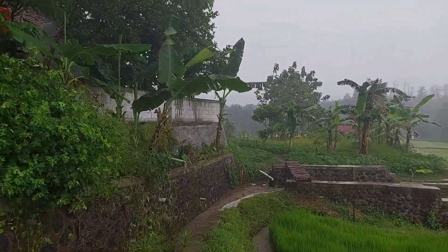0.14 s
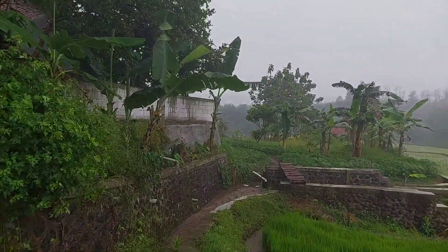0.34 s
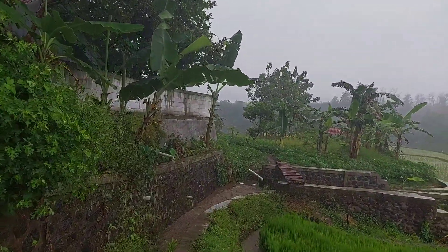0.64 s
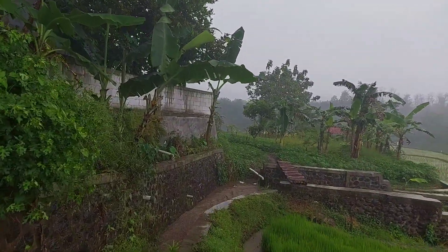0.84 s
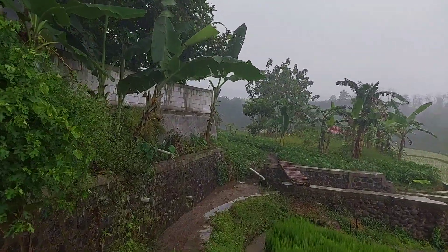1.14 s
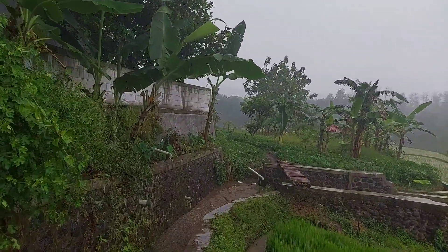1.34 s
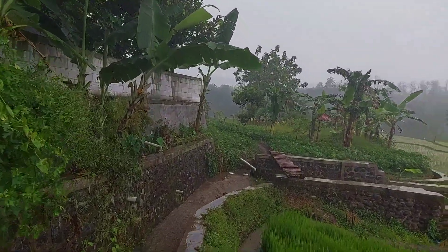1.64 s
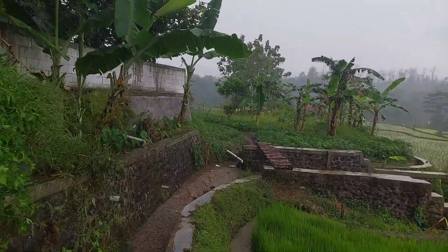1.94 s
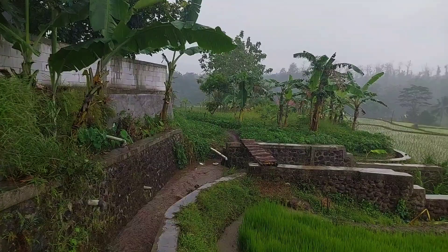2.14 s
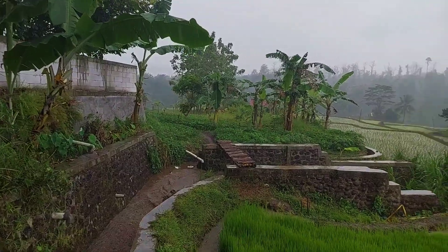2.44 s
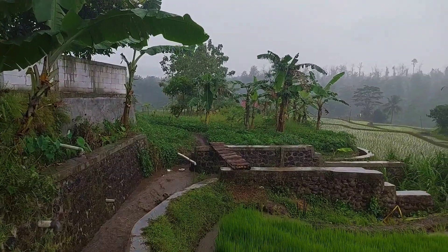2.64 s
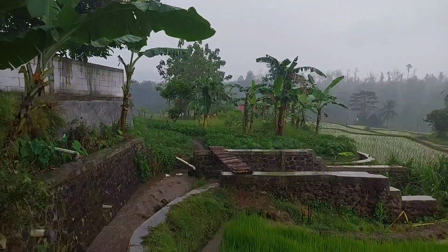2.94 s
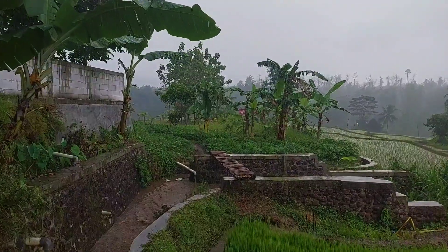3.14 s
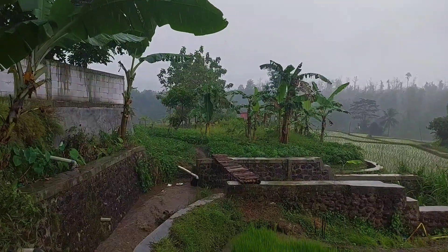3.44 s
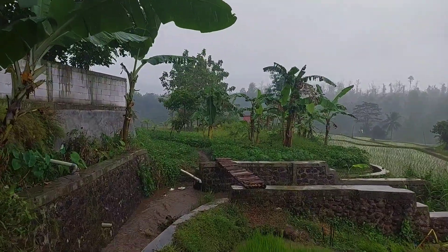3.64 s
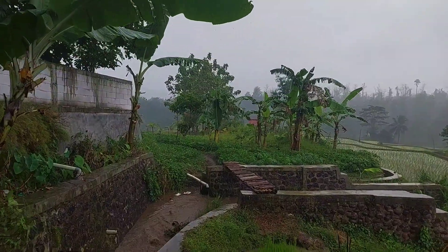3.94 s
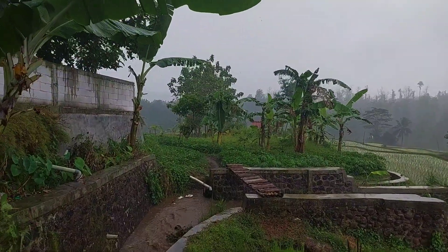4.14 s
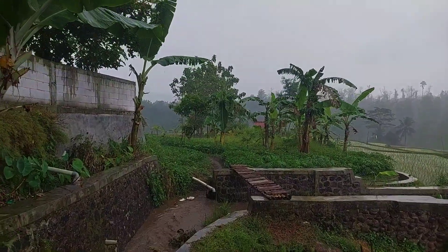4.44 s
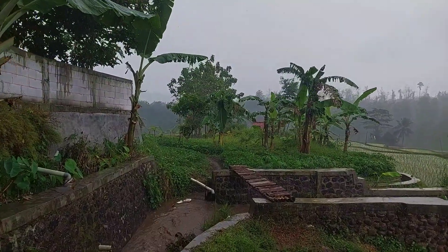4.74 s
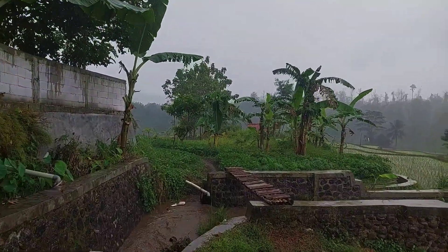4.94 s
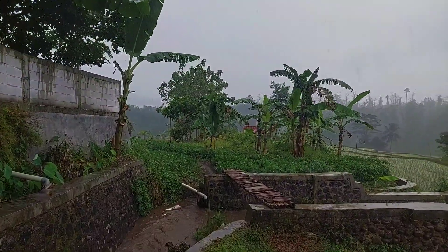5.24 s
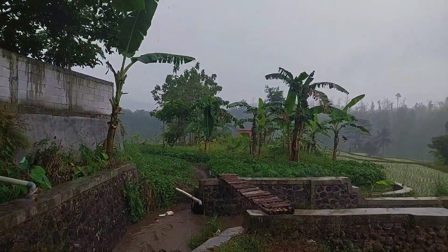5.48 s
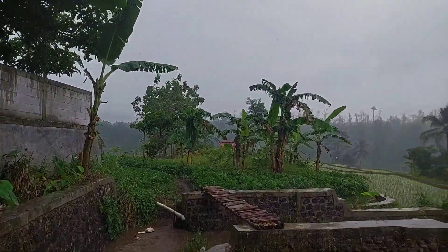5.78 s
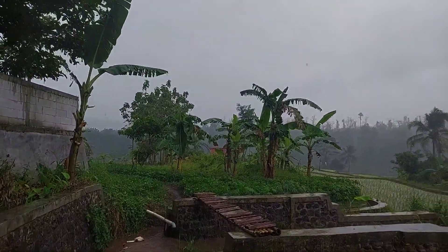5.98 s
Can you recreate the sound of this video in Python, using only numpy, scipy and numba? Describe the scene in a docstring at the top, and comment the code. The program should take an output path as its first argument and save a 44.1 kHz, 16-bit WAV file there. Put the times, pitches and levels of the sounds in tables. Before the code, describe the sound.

Heavy rain in the open, on leaves, stone and mud, runs throughout as a muffled, fluttering hiss with dense fine patter. Water films over both microphones give it a hollow bottle-like tone, lower on the left, higher on the right, with dull treble. From 0 to 1.2 s many close drops plunk and tick on the housing, on both sides, while low wind buffets mainly the right, notably near 0.8 s. At 1.73 s a heavy drop smacks the left microphone, a distorted plop with a short low wobble; the rain ducks. A louder left hit at 2.51 s drops the level further; it holds low for about a second, then climbs back. Sparse ticks and wind gusts follow, around 3, 4.1 and 4.3 s. Small knocks come near 4.6 and 5.0 s. At 5.32 s a heavy drop bursts on the right with a deep wobble and another duck. Rain strengthens from 5.7 s to the end at 6.1 s, though still held down.

```python
"""Heavy rain on leaves, stone and mud, heard by a small camera carried through it: hiss and patter made from noise
and random impacts. Water films close both microphone ports, so each rings like a tiny bottle and muffles the treble.
From the start drops ring the ports and knock the housing, while wind, made from narrow low noise, buffets the right.
Near 1.7 and 2.5 s heavy drops hit the left port, near 5.3 s the right: they overload the input, duck the gain
control and leave a film wobbling as a decaying low tone. The rain is strongest from about 5.7 s."""
import sys
import numpy as np
from scipy import signal
from scipy.fft import rfft, irfft
from scipy.io import wavfile
from scipy.ndimage import uniform_filter1d, minimum_filter1d
from numba import njit

SR = 44100
rng = np.random.default_rng(int(sys.argv[2]) if len(sys.argv) > 2 else 0)


def log_audio(samples):
    """Write samples as a 16-bit WAV file to the path given in sys.argv[1]."""
    # one column per channel
    frames = np.atleast_2d(samples).T
    # limit to full scale, then quantise
    limited = np.clip(frames, -1, 1)
    pcm = np.round(limited * 32767).astype(np.int16)
    wavfile.write(sys.argv[1], SR, pcm)


def volts(x):
    """Linear amplitude factor 10**(x/20) for a level x in dB, scalar or array-like."""
    e = np.asarray(x, float) / 20
    return 10 ** e


N = 269451
T = np.arange(N) / SR


def curve(table):
    """Columns of a table joined by straight lines in time."""
    s, *columns = np.transpose(table)
    return [np.interp(T, s, c) for c in columns]


def unit(x):
    """Scale to rms 1."""
    return x / np.sqrt(np.mean(x ** 2))


def butter(x, hz, kind, order=2):
    """Butterworth filter."""
    return signal.sosfilt(signal.butter(order, hz, kind, fs=SR, output="sos"), x)


def colour(x, table):
    """Causal (minimum-phase) filter through (frequency [Hz], level [dB]) points, from the folded cepstrum."""
    hz, db = np.transpose(table)
    grid_hz = np.maximum(np.arange(2049) * SR / 4096, 1)
    level_db = np.interp(np.log(grid_hz), np.log(hz), db)
    ceps = irfft(np.log(volts(level_db)))
    # fold the second half onto the first
    ceps[1:2048] *= 2
    ceps[2049:] = 0
    response = irfft(np.exp(rfft(ceps)))
    return signal.fftconvolve(x, response[None], axes=1)[:, :N]


def walk(rate):
    """Random levels of rms 1, held 1 / rate seconds and slewed twice."""
    k = int(SR / rate)
    steps = np.repeat(rng.standard_normal(N // k + 1), k)
    return unit(uniform_filter1d(uniform_filter1d(steps, k), k)[:N])


@njit
def svf(x, hz, width):
    """State-variable filter with a moving centre: low-pass and band-pass."""
    y, b, l = np.empty((2, len(x))), 0., 0.
    for i in range(len(x)):
        g, k = np.tan(np.pi * hz[i] / SR), width / hz[i]
        v = (b + g * (x[i] - l)) / (1 + g * (g + k))
        y[0, i], y[1, i] = l + g * v, k * v
        b, l = 2 * v - b, l + 2 * g * v
    return y


def ports(x):
    """Each wet port is a Helmholtz low-pass; the left film has a second ring, subtracted."""
    # water settles in the ports when heavy drops land:
    # (time [s], left pitch [Hz], right pitch [Hz], second left ring level [dB])
    port_rings = [(0, 560, 948, 3.5), (1.72, 566, 961, 2), (1.74, 583, 964, -23.5), (3.5, 540, 950, -10.5),
                  (4.3, 559, 952, 2), (5.3, 535, 938, -2), (5.33, 530, 883, 0.5), (6.11, 568, 874, -19)]
    # width of each port's resonance: (left [Hz], right [Hz])
    port_width = (122.4, 256)
    # second ring of the left film: (pitch [Hz], width [Hz])
    second_ring = (745, 91)
    left_hz, right_hz, second_db = curve(port_rings)
    second_hz = np.full(N, float(second_ring[0]))
    second = svf(x[0], second_hz, float(second_ring[1]))[1]
    left = svf(x[0], left_hz, float(port_width[0]))[0] - volts(second_db) * second
    right = svf(x[1], right_hz, float(port_width[1]))[0]
    return np.array([left, right])


def wind():
    """Buffets shake the right film near its own low pitch; a weaker buffeting is heard on the left."""
    # gusts, before the offset of each port: (time [s], level [dB])
    gusts = [(0, -36), (.3, -34), (.5, -46), (.8, -29), (1.05, -48.5), (1.35, -39.5), (1.9, -53),
             (2.3, -33.5), (2.6, -47), (3.05, -30.5), (3.6, -46), (4.08, -32), (4.2, -40), (4.32, -28.5),
             (4.6, -32), (4.95, -40), (5.5, -39), (6.11, -32)]
    buffets = []
    for noise in rng.standard_normal((2, N)):
        narrow = svf(noise, np.full(N, 74.), 86.0)[1]
        buffets.append(unit(svf(narrow, np.full(N, 78.), 100.0)[1]))
    scatter_db = 4.5 * walk(13)  # single buffets scatter about the gust
    port_db = np.array([[-13], [-1]])  # left, right
    return np.array(buffets) * volts(curve(gusts)[0] + scatter_db + port_db)


def patter(rate, spread_db):
    """Random impacts, rate per second, scaled to rms 1; spread_db sets how unequal their sizes are."""
    hit = rng.random(N) < rate / SR
    size = volts(spread_db * np.minimum(rng.exponential(size=N), 5.))
    return unit(hit * size * np.sign(rng.standard_normal(N)))


def rain():
    """Far hiss and nearer patter; long waves reach both ports alike, short ones do not."""
    # rain strength: (time [s], level [dB])
    strength = [(0, -33.5), (2.2, -33.5), (3.6, -31), (4.4, -33.5), (4.8, -31), (5.3, -30), (5.7, -26.5),
                (6.11, -26.5)]
    # spectrum of the rain before the ports: (frequency [Hz], level [dB])
    rain_colour = [(25, -34.5), (65, 3), (120, -5.5), (160, -8.5), (200, -2), (400, -6.5), (1000, -0.5),
                   (1500, -5), (2500, -4.5), (4000, -4), (5000, -6), (5800, -15.5), (7000, -39),
                   (16000, -89)]
    # three noise fields: left alone, right alone, common to both
    flutter_db = 3.6 * np.array([walk(40) for _ in range(3)])
    far = rng.standard_normal((3, N)) * volts(0.81 * walk(3.0) + flutter_db)
    # leaves shed their water in bunches
    clump = volts(1.6 * walk(35))
    near = np.array([patter(rate=900, spread_db=0.5) for _ in range(3)]) * clump
    field = far + volts(1.5) * near
    # drops on leaves close by are heard by both ports
    close = volts(2.0) * butter(patter(rate=120, spread_db=4.5) * clump, 1200, "low")
    shared = butter(field[2], 1100, "low", order=1)
    alone = butter(field[:2], 220, "high") + volts(-1) * field[:2]
    # the right port faces away and hears common sound 10 samples later
    shared = np.array([shared, np.roll(shared, 10)])
    close = np.array([close, np.roll(close, 10)])
    mix = volts(7.5) * shared + volts(2) * alone + close
    return colour(mix * volts(curve(strength)[0]), rain_colour)


def drops():
    """Drops ring the ports and knock the housing at their own pitches; heavy ones leave a water film wobbling."""
    # drops on the housing, ring levels before the port filter:
    # (time [s], left ring [dB], right ring [dB], knock pitch [Hz], knock over ring [dB])
    strikes = [(0.094, -10.5, -26, 3200, -22.5), (0.137, -39, -41, 458, 23), (0.26, -13.5, -14, 3580, -19),
               (0.305, -36.5, -29.5, 1427, 7.5), (0.347, -10, -13, 1380, -39),
               (0.422, -48, -41, 4580, 14.5), (0.436, -17, -18, 1500, -17), (0.456, -28, -8, 1620, -19),
               (0.619, -24, -24, 1540, -22), (0.6256, -29, -34.5, 10000, -11.5),
               (0.679, -23.5, -50, 184, 9), (0.735, -44.5, -9, 2240, -25), (1.12, -16.5, -47, 4600, -12.5),
               (1.176, -35, -10, 512, 14.5), (1.212, -30.5, -19, 4600, -27), (1.7281, 7.5, -37, 521, 9),
               (1.7298, 29.5, -32.5, 259, -7.5), (2.224, -13.5, -24.5, 496, -4),
               (2.5099, 45.5, -24.5, 3040, -21), (2.521, -6, -61, 238, 18.5),
               (3.117, -41, -14.5, 4627, -32), (3.294, -11.5, -27, 3180, -34.5),
               (3.494, -12.5, -22, 4600, -47.5), (3.645, -34.5, -15.5, 1470, -20),
               (3.751, -24, -17, 446, 4), (3.846, -11.5, -17, 2180, -21), (4.062, -13.5, -40, 3230, -30),
               (4.553, -16.5, -31.5, 402, 14), (4.593, -29, -35, 430, 15.5), (5.0224, -9, -57, 367.7, 11),
               (5.025, -37, -36, 6500, 7), (5.035, -32, -48.5, 150, 9), (5.293, -30, -29.5, 474, 14.5),
               (5.311, -38, -1, 400, 15.5), (5.3158, -42, 29, 1236, -10.5), (5.559, -43, -15, 3200, -38),
               (5.745, -18, -16.5, 470, 6), (5.889, -32, -12.5, 2210, -42), (6.059, -13, -37, 3222, -32.5)]
    # heavy drops that set a film wobbling: (time [s], port [0 left, 1 right], level [dB])
    sloshes = [(1.7301, 0, 10.5), (2.5101, 0, 6.5), (2.523, 0, -13), (5.023, 0, -8.5), (5.3185, 1, 19.5)]
    # left and right water film: (pitch [Hz], decay by 60 dB [s], swell [s])
    films = [(61.6, 0.083, 0.0017), (72, 0.11, 0.019)]
    piece_gap_s, piece_db, piece_spread_db = .0025, -11, 8  # longest gap, highest level, scatter
    knock, ring, kick = np.zeros((3, 2, N + SR))
    blow = np.diff(np.hanning(24), prepend=0)  # a short push out and back
    t = T[:SR // 2]
    chance = rng.random((len(strikes), 2, 3))
    for (s, left_db, right_db, knock_hz, knock_db), (gaps, sizes) in zip(strikes, chance):
        at = int(s * SR)
        size = volts(np.array([[left_db], [right_db]]))
        ring[:, at:at + len(blow)] += size * blow * volts(-2.0)
        # the drop breaks up and three pieces land just after; for heavy drops they grow no further
        lateness = np.cumsum((1 + gaps) / 2) * piece_gap_s
        for late, level_db in zip(lateness, piece_db - piece_spread_db * sizes):
            start = at + int(late * SR)
            ring[:, start:start + len(blow)] += np.minimum(size, 1) * blow * volts(level_db)
        # one strong inward swing between two weak outward ones
        turns = t[:1024] * knock_hz - 1
        pulse = np.exp(-(turns / 0.44) ** 2) * np.cos(2 * np.pi * turns)
        knock[:, at:at + 1024] -= size * volts(knock_db) * pulse
    for s, port, db in sloshes:
        kick[round(port), int(s * SR)] += volts(db)
    wobbles = []
    for hz, t60, swell in films:
        envelope = np.minimum(t / swell, 1) ** 3 * 1000 ** (-t / t60)
        wobbles.append(envelope * np.sin(2 * np.pi * hz * t))
    wobble = signal.fftconvolve(kick, np.array(wobbles), axes=1)[:, :N]
    ringing = ports(butter(ring[:, :N], 1300, "low") * 20)
    return ringing + knock[:, :N] + wobble


def scene():
    """Wind, rain through the wet ports, and drops on the camera."""
    return wind() + ports(rain()) + drops()


@njit
def duck(over_db, reserve_db, hold, rise_db, quick):
    """Gain in dB: a quick limiter, and under it a slow stage that holds after an overload, then climbs back."""
    gain, slow, fast, wait = np.empty(len(over_db)), 0., 0., 0.
    for i in range(len(over_db)):
        # a peak beyond the reserve pulls the slow stage down, one within 1 dB of it renews the hold
        if reserve_db - over_db[i] <= slow + 1:
            slow, wait = min(slow, reserve_db - over_db[i]), hold
        wait -= 1
        if wait < 0:
            slow = min(slow + rise_db, 0.)
        # the limiter drops at once and recovers toward the slow stage
        fast = min(fast + (slow - fast) * quick, -over_db[i])
        gain[i] = fast
    return gain


def band_limit(x):
    """A steep low-pass at the top of the band."""
    return signal.sosfilt(signal.butter(12, 15600, fs=SR, output="sos"), x)


def record(dry):
    """Microphone input: overload, treble and bass cut, hiss, then one look-ahead gain control for both channels."""
    clip_db, top_hz = 22.5, 15600
    reserve_db, hold_s, rise_db_s, quick_s = 11.0, 1.044, 23, 0.032
    # (frequency [Hz], level [dB])
    hiss = colour(rng.standard_normal(dry.shape), [(100, -84.5), (6000, -78.5), (15000, -76)])
    # the input overloads sooner on outward swings
    top = volts(clip_db + np.where(dry > 0, -1.5, 1.5))
    hard = dry / (1 + np.abs(dry / top) ** 8) ** (1 / 8)
    dulled = butter(hard, 2860, "low") + volts(-12) * hard
    x = butter(dulled + hiss, 43, "high", order=3)
    ahead = int(0.0032 * SR)
    # highest peak of either channel around each moment
    peak = -minimum_filter1d(-np.abs(x).max(0), 2 * ahead)
    over_db = 20 * np.log10(peak + 1e-9)
    gain_db = duck(over_db, reserve_db, hold_s * SR, rise_db_s / SR, 1 / (quick_s * SR))
    x = x * volts(uniform_filter1d(gain_db, ahead))
    # steep treble limit
    x = signal.sosfilt(signal.ellip(8, .2, 70, top_hz, fs=SR, output="sos"), x)
    return band_limit(np.clip(x, -1, 1))


dry = scene()
out = record(dry)
log_audio(out)
```